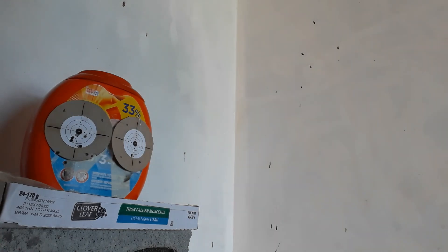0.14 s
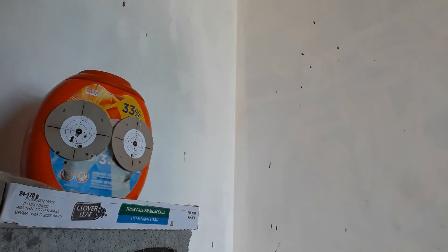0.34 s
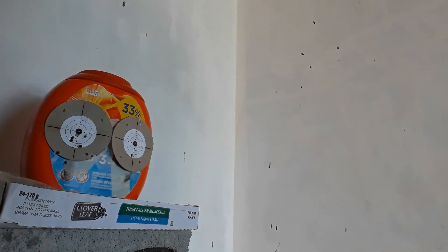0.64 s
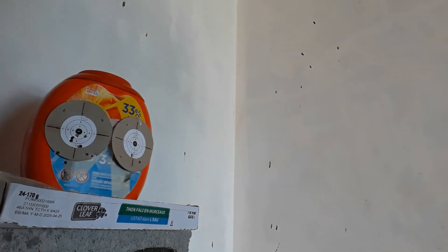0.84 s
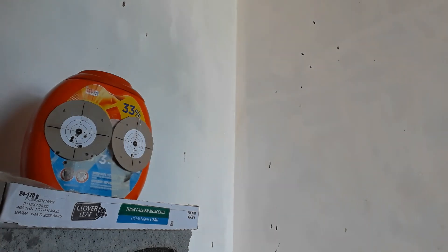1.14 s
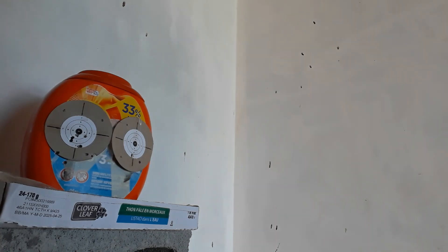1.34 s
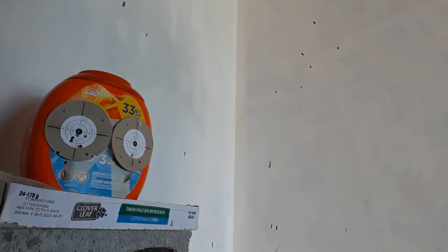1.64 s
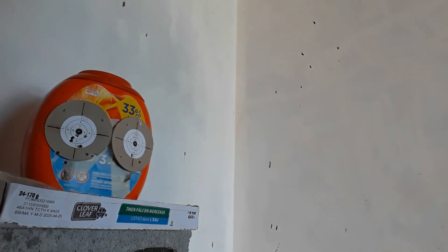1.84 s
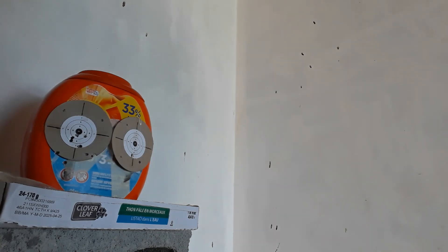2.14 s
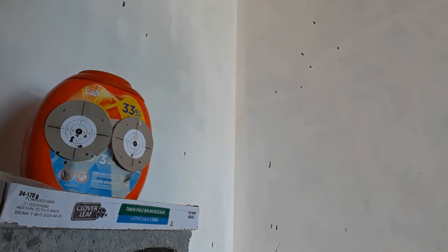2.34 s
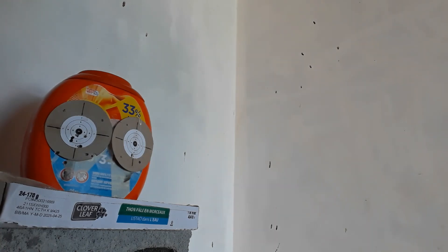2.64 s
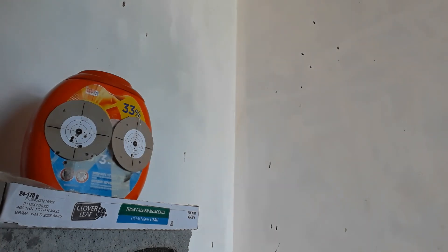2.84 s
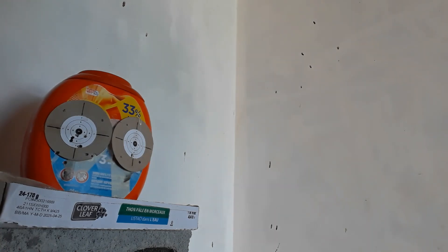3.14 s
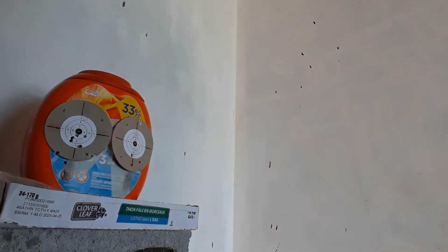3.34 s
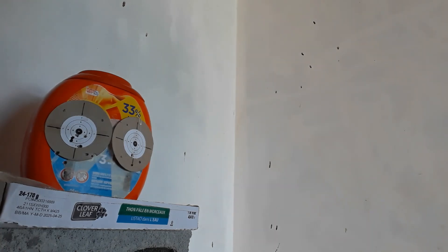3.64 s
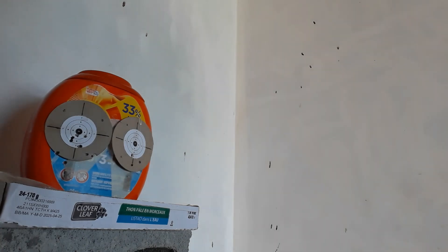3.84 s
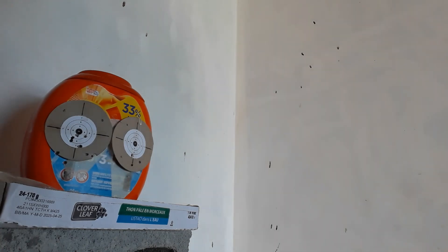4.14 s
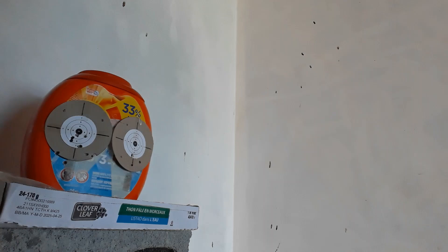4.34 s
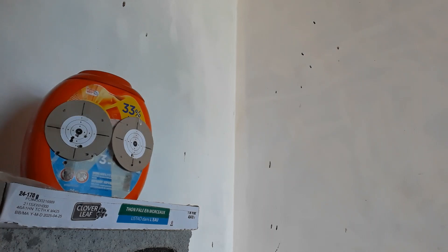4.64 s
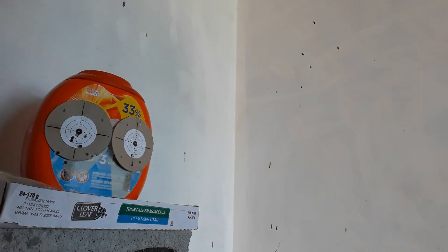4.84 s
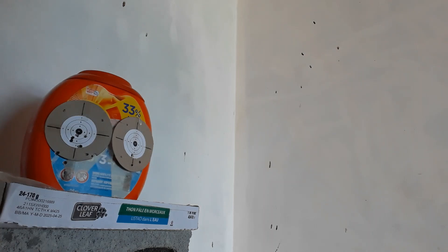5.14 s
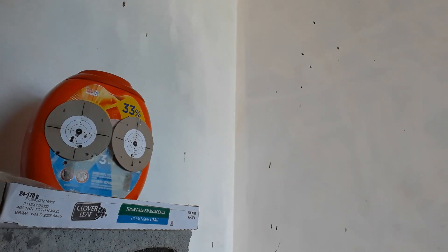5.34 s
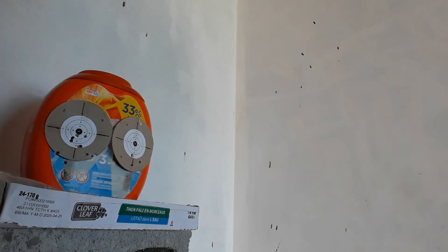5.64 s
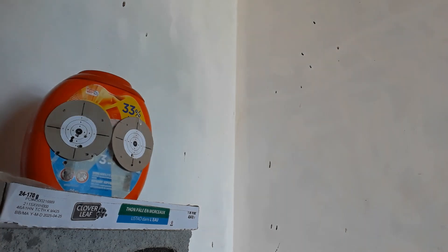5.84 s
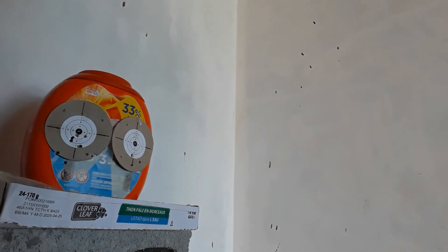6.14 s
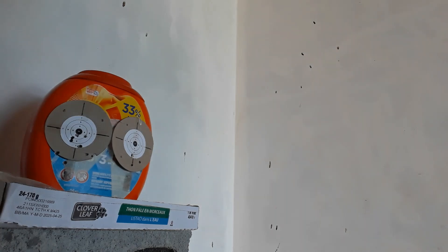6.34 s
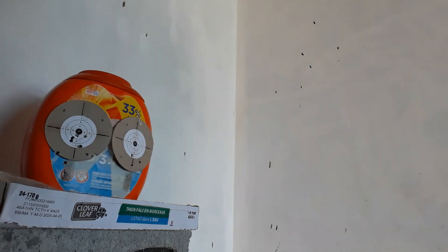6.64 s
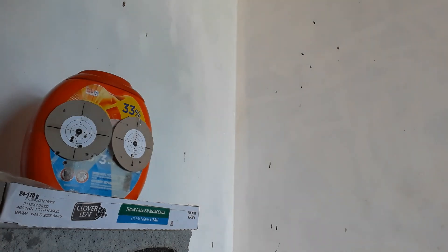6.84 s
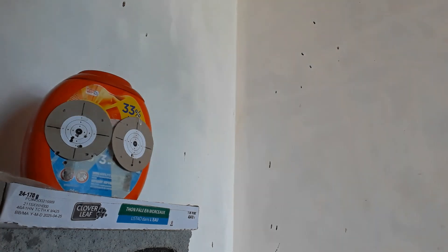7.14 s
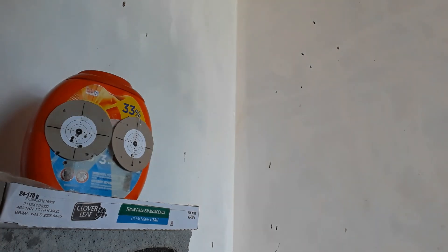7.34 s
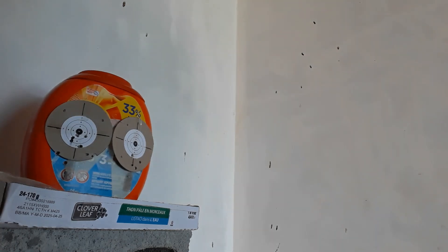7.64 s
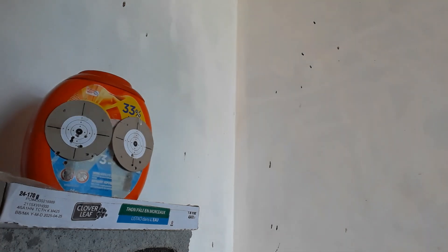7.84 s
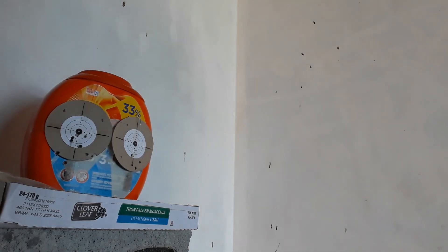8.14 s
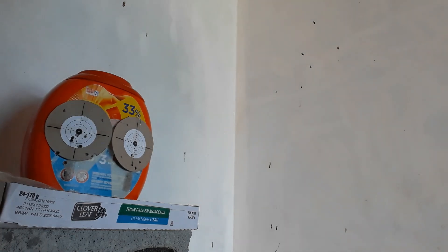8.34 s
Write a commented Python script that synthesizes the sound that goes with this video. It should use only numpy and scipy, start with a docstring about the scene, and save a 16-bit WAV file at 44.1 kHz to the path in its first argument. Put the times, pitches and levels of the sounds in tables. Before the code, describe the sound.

Close to a phone microphone in a bare room, a hard knock opens over low hiss and small handling ticks. A faint thin whistle and tiny high twitter precede a sharp air rifle crack with a dull tub thud. Cocking and loading follow with knocks, scuffs and ringing metal rattles. Rustling and the whistle return, a second crack lands, then hard knocks and a metallic latch snap finish.

```python
"""A thin wavering whistle and faint high twitter over room hiss precede an air rifle's first shot; a hard knock opens the scene.
The pellet strikes a paper target on a plastic tub in a bare corner; cocking and loading follow, with rattling metal.
The whistle returns, a second shot falls, then come hard knocks and a latch snapping shut.
Shots, knocks and scuffs are shaped bursts of hiss; metal rings resonances; whistle, twitter and squeaks are sines.
Left and right are almost unrelated noise, and the phone's gain control chokes the tail of every loud bang."""
import sys
import numpy as np
from scipy import signal
from scipy.fft import rfft, irfft, next_fast_len
from scipy.io import wavfile
from scipy.ndimage import uniform_filter1d, minimum_filter1d

SR = 44100
rng = np.random.default_rng(int(sys.argv[2]) if len(sys.argv) > 2 else 0)


def wav_out(sig):
    """Save sig, one row per channel (or a flat mono array), as 16-bit PCM at SR to the path in sys.argv[1]."""
    wavfile.write(sys.argv[1], SR, np.round(np.clip(np.atleast_2d(sig).T, -1, 1) * 32767).astype(np.int16))


def gain_from_db(level_db):
    """Turn a decibel level (scalar or array-like) into a linear amplitude factor."""
    decades = np.asarray(level_db, float) / 20
    return 10 ** decades


N = 374850
TIME = np.arange(N) / SR
BASS_HZ, TREBLE_HZ = 1780, 5900  # band edges
CREST_DB = 7.5  # a burst of hiss peaks about this far over its rms
GRAIN_DB = 1.46  # unevenness inside a burst


def coloured(points, alike=0.1):
    """Spectral shaping: filtered stereo noise of rms 1; alike is the left-right correlation."""
    hz, db = np.transpose(points)
    size = next_fast_len(N)
    bin_hz = np.arange(1, size // 2 + 2) * SR / size
    gain = gain_from_db(np.interp(np.log(bin_hz), np.log(hz), db))
    mid, side = irfft(rfft(rng.standard_normal((2, size))) * gain, size)[:, :N]
    alike = np.clip(alike, 0, 1)
    both = np.sqrt(1 + alike) * mid + np.sqrt(1 - alike) * side * np.array([[1], [-1]])
    return both / both.std()


def split(x):
    """Complementary filtering: zero-phase bass, middle and treble that add up to x."""
    bass, below = (signal.sosfiltfilt(signal.butter(2, hz, fs=SR, output="sos"), x)
                   for hz in (BASS_HZ, TREBLE_HZ))
    return bass, below - bass, x - below


def walk(rate):
    """Band-limited random fluctuation: spread 1, changing about rate times a second."""
    step = int(SR / rate)
    held = np.repeat(rng.standard_normal(N // step + 1), step)
    smooth = uniform_filter1d(uniform_filter1d(held, step), step)[:N]
    return smooth / smooth.std()


def resonant(modes, alike):
    """Resonance: noise excites modes, each given by Hz, width in Hz and dB; the sum has rms 1."""
    drive = coloured([(20, 0), (20000, 0)], alike)
    out = 0
    for hz, width, db in modes:
        ring = signal.lfilter(*signal.iirpeak(hz, hz / width, SR), drive)
        out = out + gain_from_db(db) * ring / ring.std()
    return out / out.std()


def add_burst(power, s, db, rise, hold, t60):
    """Incoherent addition: the power of one rise, hold and exponential fall joins the line."""
    start = int((s - 0.003) * SR)  # the rise begins just ahead of s
    rise = max(rise, 1e-3)
    t = TIME[:min(N - start, SR // 2)] - rise
    fall_db = -60 * np.clip(t - max(hold, 0), 0, None) / max(t60, 0.01)
    envelope = np.clip(1 + t / rise, 0, 1) ** 2 * gain_from_db(db - CREST_DB + fall_db)
    power[start:start + len(t)] += envelope ** 2


def bursts(rows, colour, bass_linger):
    """Frequency-dependent decay: each row (s, dB, bass dB, treble dB, rise, hold, t60) shapes three
    bands of hiss, and the bass decay time is multiplied by bass_linger."""
    power = np.zeros((3, N))
    for s, db, bass_db, treble_db, rise, hold, t60 in rows:
        add_burst(power[0], s, db + bass_db, rise, hold, t60 * bass_linger)
        add_burst(power[1], s, db, rise, hold, t60)
        add_burst(power[2], s, db + treble_db, rise, hold, t60)
    out = 0
    for band_power, band in zip(power, split(colour)):
        grain = gain_from_db(GRAIN_DB * walk(400))
        out = out + np.sqrt(band_power) * grain * band
    return out


def metal(table, modes, hold, low_hz):
    """Resonance and poor low radiation: bursts of ringing noise, high-passed as small parts demand."""
    power = np.zeros(N)
    for s, db, t60 in table:
        add_burst(power, s, db, 0.003, hold, t60)
    high_pass = signal.butter(6, low_hz, "high", fs=SR, output="sos")
    return np.sqrt(power) * signal.sosfilt(high_pass, resonant(modes, alike=0.58))


def struck(table, modes, scatter_db, detune):
    """Modal impact: each blow rings every mode at once, varying in pitch, strength and phase."""
    out, t = np.zeros(N), TIME[:SR // 8]
    hz, _, mode_db = np.transpose(modes)
    chance = rng.standard_normal((len(table), 3, len(modes)))
    for (s, db, t60), (size, pitch, phase) in zip(table, chance):
        angle = 2 * np.pi * np.outer(hz * (1 + detune * pitch), t) + 3 * phase[:, None]
        swing = gain_from_db(mode_db + scatter_db * size) @ np.sin(angle)
        fall = gain_from_db(db - 60 * t / (0.76 * t60))  # the tones die faster than the table's t60
        onset = np.clip(t / 0.0022, 0, 1)
        start = int((s - 0.002) * SR)
        out[start:start + len(t)] += fall * onset * swing / gain_from_db(mode_db).sum()
    return out


def notes(rows, tremble_hz, waver_db, rate):
    """Frequency and amplitude modulation: short gliding sines with soft ends, trembling."""
    out, tremble, waver = np.zeros(N), tremble_hz * walk(rate), gain_from_db(waver_db * walk(rate))
    for s, length, from_hz, to_hz, db in rows:
        span = slice(int(s * SR), int((s + length) * SR))
        share = np.linspace(0, 1, len(out[span]))
        hz = from_hz + (to_hz - from_hz) * share + tremble[span]
        phase = 2 * np.pi * np.cumsum(hz) / SR
        soft_ends = np.sin(np.pi * share) ** 0.56
        out[span] += np.sqrt(2) * gain_from_db(db) * soft_ends * waver[span] * np.sin(phase)
    return out


# Room hiss and rustle of clothes. Each row: time in seconds, level in dB before bass lift and flicker.
HISS_LEVEL = [(0.0, -65.5), (0.4, -62.5), (0.62, -65), (1.85, -64.5), (2.15, -67), (2.82, -66),
              (3.34, -65.5), (3.5, -60), (4.2, -59), (4.95, -62), (5.06, -67), (5.25, -63.5), (5.56, -61),
              (5.92, -64), (6.37, -56.5), (7.01, -59), (7.4, -54), (7.74, -59), (7.93, -55), (8.07, -76),
              (8.29, -57.5), (8.5, -61.5)]
# Spectrum of the hiss. Each row: frequency in Hz, relative level in dB per Hz.
HISS_SPECTRUM = [(18, -47), (30, 0), (76, -6), (147, -6.5), (364, -8), (1920, -4), (2130, -1.5),
                 (2490, -4.5), (15000, -4)]


def hiss():
    """Amplitude-modulated noise: hiss swells with the rustle of clothes, with brief random lifts of a
    few milliseconds."""
    db = np.interp(TIME, *np.transpose(HISS_LEVEL))
    bass, middle, treble = split(coloured(HISS_SPECTRUM, alike=0.064))
    lifts_db = 2.9 * np.clip(walk(110) - 0.6, 0, None)
    waver_db = 0.8 * walk(30)
    flickering_treble = gain_from_db(1.1 * walk(40)) * treble
    return gain_from_db(db + lifts_db + waver_db) * (gain_from_db(1.88) * bass + middle + flickering_treble)


# Two spells of whistle, one list each. Each row: time in seconds, pitch in Hz, level in dB, both before waver.
WHISTLE_SPELLS = [
    [(2.63, 2030, -90), (2.67, 2095, -69), (2.705, 2145, -78), (2.74, 2170, -73), (2.79, 2150, -88),
     (2.89, 2103, -79), (3.0, 2070, -82), (3.04, 2115, -78), (3.1, 2090, -92), (3.22, 2060, -81),
     (3.3, 2050, -90)],
    [(6.04, 2107, -90), (6.08, 2110, -68), (6.14, 2110, -82), (6.2, 2167, -64.5), (6.28, 2140, -93),
     (6.78, 2130, -86), (6.87, 2105, -73), (6.96, 2120, -70), (7.02, 2110, -92), (7.08, 2100, -67),
     (7.16, 2090, -84), (7.22, 2100, -81), (7.32, 2130, -91), (7.45, 2050, -71.5), (7.6, 2040, -79),
     (7.86, 2065, -75), (8.07, 2065, -70), (8.3, 2086, -82), (8.5, 2050, -75)],
]


def whistle():
    """Frequency modulation: the summed phase of a wandering pitch makes a thin sine that comes and goes."""
    out, tremble_hz, waver_db = 0, 14 * walk(60), 3.5 * walk(25)
    for spell in WHISTLE_SPELLS:
        s, hz, db = np.transpose(spell)
        phase = 2 * np.pi * np.cumsum(np.interp(TIME, s, hz) + tremble_hz) / SR
        level = gain_from_db(np.interp(TIME, s, db, -200, -200) + waver_db)  # silent outside the spell
        out = out + np.sqrt(2) * level * np.sin(phase)
    return out


def twitter(count):
    """Random tone bursts: faint high blips at scattered moments and pitches, each sagging a little."""
    from_s, to_s = 2.7, 3.12  # approximate: the scatter may step just outside
    low_hz, high_hz = 6800, 13000
    length_s, sag, middle_db = 0.015, 0.02, -73
    when, pitch, size = rng.random((count, 3)).T
    s = from_s + (to_s - from_s) * (np.arange(count) + 3 * (when - 0.5)) / count
    hz = low_hz * (high_hz / low_hz) ** pitch
    db = middle_db + 9 * (size - 0.5)
    rows = [(t, length_s, f, f * (1 - sag), d) for t, f, d in zip(s, hz, db)]
    return notes(rows, tremble_hz=170, waver_db=4, rate=600)


# High squeaks of metal on metal. Each row: start in seconds, length in seconds, first pitch in Hz,
# last pitch in Hz, level in dB, before tremble and waver.
SQUEAK_GLIDES = [(.715, .025, 14600, 14600, -77), (.76, 0.016, 8300, 8100, -61),
                 (1.26, 0.018, 7000, 6900, -69), (2.59, .1, 14570, 14570, -74),
                 (2.71, 0.035, 8000, 7440, -68), (6.192, .012, 4900, 5030, -55),
                 (6.192, 0.027, 6250, 6460, -54.5), (6.195, .02, 8400, 8000, -57),
                 (8.247, 0.0163, 2720, 2170, -43), (8.257, 0.026, 2130, 2150, -57)]


def squeaks():
    """Frequency modulation: fast random tremble roughens little gliding chirps of the moving parts."""
    return notes(SQUEAK_GLIDES, tremble_hz=130, waver_db=2.5, rate=450)


# Blows of a loose metal part. Each row: time in seconds, nominal peak in dB, t60 in seconds.
RATTLE_BLOWS = [(4.155, -43.5, 0.07), (4.1856, -38, 0.056), (4.2223, -55, 0.068), (4.2522, -40.5, 0.042),
                (4.3874, -49, 0.04), (4.5301, -43, 0.094), (4.567, -41.5, 0.079), (4.6029, -39, 0.042),
                (5.4206, -39, 0.053), (5.457, -37, 0.044)]
# Its resonances. Each row: frequency in Hz, width in Hz, level in dB.
RATTLE_RESONANCES = [(2130, 38, -15), (3220, 54, -2), (4200, 250, 3.5), (5180, 310, -6), (6770, 820, -6.5),
                     (7700, 170, -17)]
# Broad treble of the small contacts, one row: frequency in Hz, width in Hz, level in dB.
CONTACT_BUZZ = (11000, 7000, 0)


def rattle():
    """Modal impact and resonance: clear ringing of a loose part with a buzz of further small contacts."""
    ring = struck(RATTLE_BLOWS, RATTLE_RESONANCES, scatter_db=1.8, detune=0.012)
    buzz = metal(RATTLE_BLOWS, RATTLE_RESONANCES + [CONTACT_BUZZ], hold=0.0046, low_hz=1820)
    return gain_from_db(1.5) * ring + gain_from_db(-1.5) * buzz


# Latch snapping shut. Each row: time in seconds, nominal peak in dB, t60 in seconds.
LATCH_BLOWS = [(8.2245, -29, 0.097), (8.2485, -28, 0.053)]
# Its resonances. Each row: frequency in Hz, width in Hz, level in dB.
LATCH_RESONANCES = [(2580, 170, -5), (3120, 710, 2), (3980, 300, 3.5), (5800, 1200, -9), (8500, 7600, -11)]


def latch():
    """Resonance: two snaps excite the broad, damped modes of the latch."""
    return metal(LATCH_BLOWS, LATCH_RESONANCES, hold=0.0049, low_hz=2050)


def ticks(count):
    """Random point process: rows of faint knocks, a little over the hiss (s, peak dB, bass dB, t60 s)."""
    over_hiss_db, spread_db, t60_s = 9, 2, 0.075
    when, size, bass = rng.random((count, 3)).T
    s = 0.01 + 0.98 * when * N / SR
    excess_db = over_hiss_db - spread_db * np.log(1 - size)
    db = np.interp(s, *np.transpose(HISS_LEVEL)) + excess_db
    return [(t, d, 8 * (b - 0.5), t60_s) for t, d, b in zip(s, db, bass)]


# Knocks and scuffs of cocking and loading. Each row: time in seconds, nominal peak in dB,
# relative bass in dB, t60 in seconds (middle and treble).
HANDLING_KNOCKS = [(0.064, -51, 4.5, 0.087), (0.278, -45, -13, 0.24), (0.302, -35, 0.5, 0.05),
                   (0.357, -23, 0.5, .034), (0.377, -10, -2, 0.044), (0.393, -28.5, 6, 0.08),
                   (0.41, -27.5, -4, 0.08), (0.429, -33, -.5, 0.075), (0.489, -48.5, 2, 0.088),
                   (0.535, -49, -2, 0.13), (0.648, -45.5, -2, 0.12), (0.923, -42.5, 1, 0.035),
                   (0.946, -44.5, -5, .073), (1.162, -54, -1, .06), (1.182, -50, 6, 0.084),
                   (1.209, -50, 0.5, 0.14), (1.363, -50, 0, .043), (1.618, -46.5, -3, .054),
                   (1.75, -43.5, .5, 0.031), (1.803, -52, 3, .079), (1.832, -49.5, 6, .068),
                   (1.85, -46, 3.5, .083), (1.869, -46.5, 1, .12), (1.93, -39.5, 2.5, .093),
                   (2.767, -51.5, -4, .1), (2.805, -49, 1.5, 0.073), (3.048, -52, 0, .065),
                   (3.249, -51, 5, 0.079), (3.458, -46.5, -1, 0.12), (3.477, -42, 3, 0.22),
                   (3.505, -37.5, 2.5, 0.07), (3.555, -46, -7, 0.09), (3.582, -41, 3, .051),
                   (3.671, -39.5, 2, 0.044), (3.716, -37.5, -2, .051), (3.728, -39, 0, 0.061),
                   (3.793, -29.5, -2.5, 0.035), (3.835, -28.5, 2.5, 0.036), (3.871, -42.5, 3, 0.19),
                   (3.894, -35, 1, .055), (3.907, -38.5, -2, 0.11), (3.965, -27, 2, .055),
                   (4.014, -45.5, 2, 0.12), (4.079, -34.5, -1, 0.046), (4.109, -40, -2, 0.079),
                   (4.387, -41.5, -26, .033), (4.463, -39, 6, .021), (4.496, -47, 10, 0.055),
                   (4.696, -26.5, 1, 0.065), (4.728, -25.5, 1, 0.076), (4.809, -44, 0, 0.11),
                   (4.941, -48, -7, 0.14), (4.985, -49, 2.5, 0.21), (5.418, -39, -1, .077),
                   (5.439, -36, -5, 0.11), (5.472, -39, -6, .046), (5.521, -45, -5, .044),
                   (5.584, -21.5, -3.5, 0.049), (5.637, -44, 2, 0.037), (5.668, -46.5, 3, .066),
                   (5.699, -45, -1, .053), (5.738, -49.5, 6, 0.064), (5.777, -40, -1.5, 0.04),
                   (5.802, -46, 4, .11), (5.828, -37, 3.5, 0.041), (5.853, -46.5, 3, .06),
                   (5.929, -44.5, 2.5, 0.074), (6.062, -41, 1, 0.041), (6.079, -45.5, 2.5, 0.16),
                   (6.158, -43, 5.5, 0.14), (6.184, -39.5, 2, 0.079), (6.225, -39.5, 2, .045),
                   (6.346, -43, -1, 0.045), (6.36, -45.5, 10.5, 0.049), (6.774, -39, 1.5, 0.14),
                   (7.686, -41.5, -4, .052), (7.701, -32, 4, 0.049), (7.832, -31.5, -2.5, 0.099),
                   (7.917, -37.5, 10, 0.048), (7.949, -36, 1, .029), (7.983, -24, -2, 0.064),
                   (8.005, -43, 1, .06), (8.017, -28.5, 4.5, .069), (8.051, -25, 2.5, 0.076),
                   (8.108, -37, -4, 0.039), (8.134, -11.5, 0.5, 0.061), (8.156, -11, -6.5, 0.078),
                   (8.183, -24, 5.5, 0.087), (8.327, -37.5, -4, .07)]
# Soft bursts that swell before they fade, one of them hiss returning after the first shot.
# Each row: start in seconds, nominal peak in dB, relative bass in dB, rise in seconds,
# t60 in seconds (middle and treble).
SOFT_SWELLS = [(0.225, -39, 4.5, 0.012, .083), (.664, -48.5, 0, 0.0083, 0.037),
               (3.395, -49, 4, 0.012, 0.38), (4.1, -44, -1.5, 0.0061, .05), (4.86, -28, -0.5, 0.019, 0.054),
               (5.018, -35, 0.5, .013, 0.082), (5.314, -34.5, 1.5, 0.015, 0.06),
               (5.404, -38, 1, .011, .077), (6.198, -39.5, -14, 0.0091, .045), (8.332, -37, 1, .012, 0.04)]
# Hardest knocks are duller. Each row: peak in dB, relative treble in dB.
TREBLE_BY_FORCE = [(-50, -0.5), (-41, -1), (-18.5, 0), (-12, -7)]
# Spectrum of the knocks. Each row: frequency in Hz, relative level in dB per Hz.
KNOCK_SPECTRUM = [(18, -32), (30, -5.5), (2240, -3.5), (3590, -1.5), (3880, -1.5), (6540, -1), (9190, 0),
                  (15500, -0.5)]


def knocks():
    """Damped broadband bursts: dry knocks and scuffs of hands, barrel and stock, ticks and soft swells."""
    rise_s, hold_s = 0.0028, 0.0038
    blows = [(s, db, bass, rise_s, t60) for s, db, bass, t60 in HANDLING_KNOCKS + ticks(count=30)]
    rows = []
    for s, db, bass, rise, t60 in blows + SOFT_SWELLS:
        treble = np.interp(db, *np.transpose(TREBLE_BY_FORCE))
        rows.append((s, db, bass, treble, rise, hold_s, t60))
    return bursts(rows, coloured(KNOCK_SPECTRUM, alike=0.056), bass_linger=1.25)


# Pellet strikes. Each row: time in seconds, nominal crack peak in dB, relative bass in dB,
# thud of the tub in dB relative to the peak.
PELLET_STRIKES = [(3.3144, -5.5, -0.5, -16), (7.5256, -5.5, 0, -28.5)]
# Spectrum of crack and tail. Each row: frequency in Hz, relative level in dB per Hz.
SHOT_SPECTRUM = [(18, -57), (30, -18.5), (389, -4.5), (1720, -7), (2360, -6), (2620, -8), (4310, -6),
                 (9940, -4), (15500, -6.5)]
# Spectrum of the tub. Each row: frequency in Hz, relative level in dB per Hz.
THUD_SPECTRUM = [(20, -8), (150, 8), (220, -13), (500, -38), (20000, -60)]


def shots():
    """Impulse and reverberation: blast and strike blur into a dense crack; tub thuds, walls ring on weakly."""
    hold_s, crack_t60_s = 0.009, 0.04
    tail_db, tail_t60_s, tail_bass_t60_s = -20, 0.079, 0.083
    cracks, tails, thuds = [], [], []
    for s, db, bass, thud_db in PELLET_STRIKES:
        cracks.append((s, db, bass, -3, 0.0012, hold_s, crack_t60_s))
        # the treble of the crack keeps growing after the front
        cracks.append((s, db - 3, -8, 3, 0.0077, 0.003, 0.035))
        tails.append((s, db + tail_db, bass + 6.2, 0, 0.003, hold_s + 0.011, tail_t60_s))
        thuds.append((s, db + thud_db, 0, 0, 0.004, hold_s, 0.09))
    crack = bursts(cracks, coloured(SHOT_SPECTRUM, alike=0.028), bass_linger=1.9)
    tail = bursts(tails, coloured(SHOT_SPECTRUM, alike=0.1), bass_linger=tail_bass_t60_s / tail_t60_s)
    thud = bursts(thuds, coloured(THUD_SPECTRUM, alike=0), bass_linger=0.46)
    return crack + tail + thud


def scene():
    """Superposition and level difference: all sources add, a little to the right."""
    right_lead_db = 3
    background = hiss() + whistle() + twitter(count=26)
    near = squeaks() + rattle() + latch() + knocks() + shots()
    return (background + near) * gain_from_db(np.array([[-right_lead_db], [right_lead_db]]) / 2)


def gain_control(x, knee_db, share, late, hold, ease):
    """Dynamic compression: gain falls a moment after the level passes the knee, holds, then eases back."""
    power = uniform_filter1d(np.mean(x ** 2, axis=0), 128)
    over_db = np.clip(10 * np.log10(power + 1e-12) - knee_db, 0, None)
    held = -minimum_filter1d(-over_db, int(hold * SR))
    eased = uniform_filter1d(held, int(ease * SR))
    # both windows are centred, so half their length is added to the delay
    delayed = np.interp(TIME - late - (hold + ease) / 2, TIME, eased)
    return x * gain_from_db(-share * delayed)


def band_limit(x):
    """A steep low-pass at the top of the band."""
    return signal.sosfilt(signal.butter(12, 17100, fs=SR, output="sos"), x)


def record(dry):
    """Compression and band limiting: the phone ducks after loud bangs, then cuts top and bottom."""
    low_hz, top_hz = 36, 15850  # the microphone's bass limit; the upper cut
    ducked = gain_control(dry, knee_db=-34.5, share=0.68, late=0.0073, hold=0.046, ease=0.03)
    topped = signal.sosfilt(signal.ellip(8, 0.3, 45, top_hz, fs=SR, output="sos"), ducked)
    finished = signal.lfilter(*signal.butter(1, low_hz, "high", fs=SR), topped)
    return band_limit(finished)


dry = scene()
out = record(dry)
wav_out(out)
```